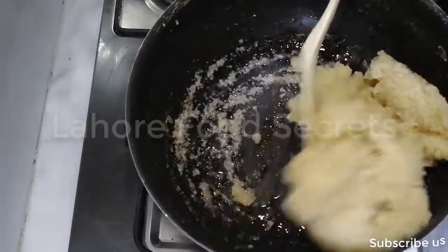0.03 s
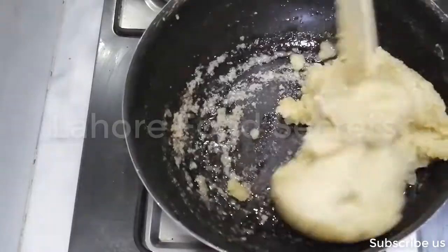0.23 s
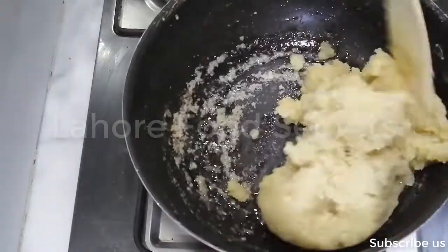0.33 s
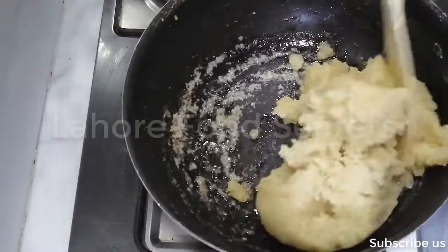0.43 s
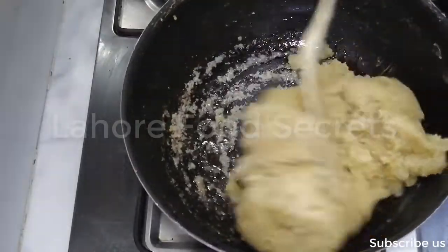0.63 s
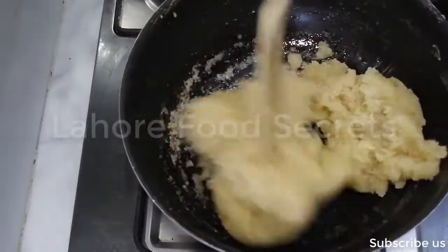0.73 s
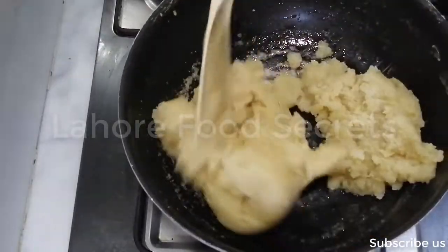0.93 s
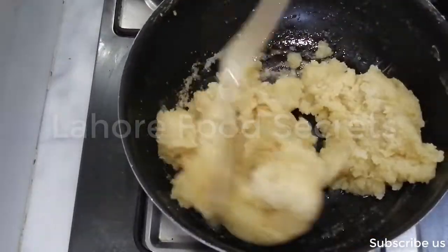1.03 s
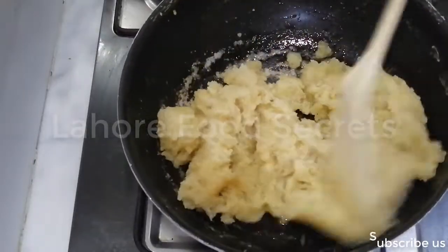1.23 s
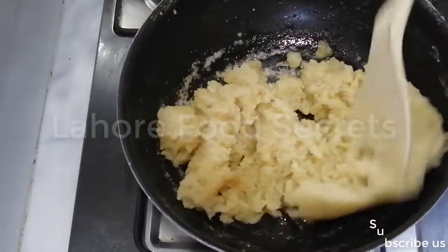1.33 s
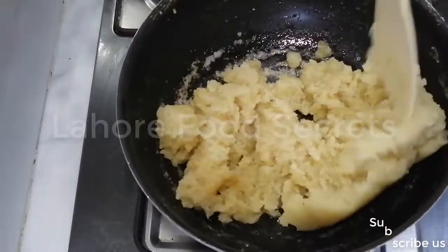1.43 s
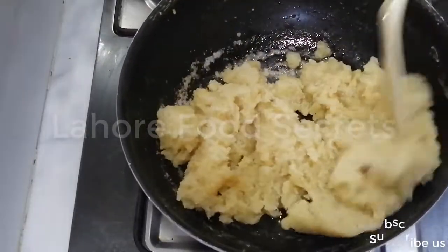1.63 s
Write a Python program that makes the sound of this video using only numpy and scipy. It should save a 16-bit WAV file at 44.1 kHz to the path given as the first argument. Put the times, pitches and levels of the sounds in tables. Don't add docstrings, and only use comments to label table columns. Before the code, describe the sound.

A spatula stirring thick, grainy food strikes a metal pan hard with a low boom, then scrapes and crackles quietly before two lighter knocks close together; close stereo microphone in a small hard kitchen.

```python
import sys
import numpy as np
from scipy import signal
from scipy.io import wavfile

SR = 44100
rng = np.random.default_rng(int(sys.argv[2]) if len(sys.argv) > 2 else 0)


def wav_out(sig):
    wavfile.write(sys.argv[1], SR, np.round(np.clip(np.atleast_2d(sig).T, -1, 1) * 32767).astype(np.int16))


def undo_db(level):
    steps = np.asarray(level, float) / 20
    return 10 ** steps


N = 74970

# frequency in Hz, left-right likeness 0 to 1.
EAR_LIKENESS = [(60, 1), (180, 0.3), (550, 0.53), (1650, 0.15), (4970, 0.02), (15000, 0.025)]
# frequency in Hz, left over right in dB.
EAR_LEAN = [(100, 1), (320, 3.5), (700, -1.5), (2400, 0.5), (4600, -16.5), (7200, 6), (9800, 9.5),
            (14500, -15.5)]
# frequency in Hz, density in dB per Hz.
LOW_AIR_SPECTRUM = [(25, -44), (45, -15), (75, 4), (130, -8.5), (210, -19), (300, -6.5), (750, -12.5),
                    (1500, -18)]
HIGH_AIR_SPECTRUM = [(1000, -28), (2000, -13), (3200, 4), (3900, 0.5), (5600, -6), (9000, -2), (13000, 3),
                     (16000, -5.5)]
LOW_AIR_DB, HIGH_AIR_DB = -60, -62.5

# time in seconds, sizzle in dB, scrape in dB.
STROKE_LEVELS = [(0, -60, -67.5), (.15, -60.5, -69), (.3, -62.5, -61.5), (.5, -63, -74),
                 (.65, -58.5, -67.5), (.75, -58.5, -67.5), (.78, -55.5, -66), (.87, -53.5, -64),
                 (.93, -55.5, -60.5), (1.0, -56, -59.5), (1.02, -53.5, -62.5), (1.1, -50.5, -57),
                 (1.14, -56.5, -64), (1.16, -56.5, -65), (1.3, -58.5, -67.5), (1.5, -55, -64.5),
                 (1.7, -56.5, -65)]
# frequency in Hz, width in Hz, level in dB.
SIZZLE_PEAKS = [(4210, 430, -8), (5500, 530, 5), (6000, 780, 5.5), (6800, 2100, -5), (7120, 840, 4.5),
                (8800, 5600, -56.5)]
SCRAPE_PEAKS = [(739, 33, 3), (1424, 40, -11.5), (1950, 91, 1), (2415, 40, -4), (2780, 420, 4),
                (3226, 270, -1)]
# time in seconds, hum in dB, shove in dB.
LOAD_LEVELS = [(0, -50.5, -52), (.04, -46.5, -79), (.09, -58.5, -64), (.3, -50.5, -52), (.52, -56.5, -72),
               (.62, -58, -70), (.7, -58.5, -57), (.76, -56.5, -86), (.79, -54.5, -62), (.84, -73, -77),
               (.94, -62.5, -48.5), (1.03, -60.5, -63.5), (1.1, -59, -57), (1.21, -74, -56),
               (1.3, -73, -56), (1.45, -113, -64), (1.55, -60, -97), (1.7, -73.5, -55)]
# start in seconds, peak in dB, frequency in Hz, ring t60 in seconds.
BLADE_SNAGS = [(0.119, -50, 1900, 0.0047), (0.655, -44, 5100, 0.0094), (0.781, -49, 1436, 0.1),
               (0.923, -44.5, 2830, 0.0044), (0.988, -43, 8400, 0.00085), (1.013, -38.5, 5500, 0.0045),
               (1.0226, -43, 6250, 0.0067), (1.037, -42, 6800, 0.0046), (1.0852, -35.5, 4760, 0.0066),
               (1.083, -47.5, 1570, 0.03), (1.0994, -40, 6450, 0.0082), (1.107, -45, 2830, 0.014),
               (1.121, -50, 2660, 0.036), (1.175, -63, 5700, 0.0075), (1.3074, -37.5, 5890, 0.017),
               (1.381, -39, 6360, 0.0036), (1.625, -41, 7000, 0.00097)]

# start in seconds, peak in dB, contact softness in seconds, left over right in dB,
# boom lag in seconds.
KNOCK_EVENTS = [
    (0.2313, -23.5, 0.00011, -2, 0.0039),
    (1.1925, -30, 0.00014, -5.5, 0.0073),
    (1.2565, -35, 0.00014, -2, 0.0067),
]
# frequency in Hz, t60 in seconds, level in dB.
BLADE_THOCK = [(1230, 0.0058, -23.5), (1120, 0.024, -27), (1117, 0.01, -29.5)]
# frequency in Hz, t60 in seconds, dB re peak in knocks 1, 2, 3.
WALL_MODES = [(614.5, 0.092, -12.5, -17, -51), (744, 0.087, -12, -32, -28), (743, 0.26, -15, -41, -46),
              (660, 0.052, -3.5, -35, -21.5), (827, 0.16, -3, -11.5, -9.5), (937, 0.11, -16.5, -6, -8),
              (1140, 0.017, -12.5, -17.5, -19), (1270, 0.017, -18, -4, -22), (1428, 0.2, -6.5, -17, -38),
              (1480, 0.31, -16, -9, -15), (1642, 0.11, -47, -1.5, -34), (2205, 0.08, -22, -16.5, -14),
              (2410, 0.21, -8, -13, -10.5), (2830, 0.17, -19, -19, -21)]
RIM_MODES = [(3260, 0.036, -7, -31, -40), (3267, 0.12, -1, -46, -38), (4270, 0.11, -14.5, -38, -41),
             (5242, 0.061, -8, -10.5, -30), (5925, 0.093, -8.5, -4.5, -37), (6530, 0.055, -18, -20, -41),
             (7000, 0.14, -21, -7.5, -39), (10700, 0.063, -40, -14, -44)]
# frequency in Hz, t60 in seconds, dB in knocks 1, 2, 3.
BOOM_MODES = [(83.4, 0.35, -25, -36, -69), (129.8, 0.25, -21.5, -71, -30.5), (170.1, 0.17, -20, -49, -34.5),
              (200.5, 0.053, -17, -36.5, -47), (97.7, 0.49, -35, -60, -35)]
STAND_MODES = [(245.3, 0.59, -35, -55, -67), (280, 0.31, -29.5, -65, -38), (308.6, 0.38, -34.5, -38, -37),
               (326.4, 0.18, -37, -68, -31.5), (327, 0.14, -28, -64, -40), (420, 0.19, -40, -33.5, -42),
               (490.5, 0.27, -26.5, -34.5, -67)]
# low edge in Hz, high edge in Hz, t60 in seconds, dB in knocks 1, 2, 3.
SHIVER_BANDS = [(250, 570, 0.29, -34, -47, -47.5), (620, 1330, 0.33, -36, -44.5, -48),
                (1620, 2560, 0.41, -47, -53, -54.5), (4200, 5700, 0.17, -46.5, -60, -66)]
BOOM_PUSH_S, STAND_PUSH_S = 0.0044, 0.00055
CLUSTER_SHARE, EAR_SPREAD_DB = 0.0413, 3.5
CRACK_DB, CRACK_S, CRACK_TOP_HZ = -6.5, 0.0032, 5500

# start in seconds, peak in dB, frequency in Hz, ring t60 in seconds.
PAN_SETTLES = [(.2455, -26, 720, 0.027), (0.244, -32.5, 1430, 0.043), (0.247, -35, 3250, 0.046),
               (.335, -38.5, 173, 0.14), (.342, -43.5, 325.4, 0.096), (.395, -51, 171.6, 0.11),
               (.575, -52, 299, 0.09), (.775, -49.5, 165, 0.25), (1.266, -38, 680, 0.019),
               (1.325, -46, 280, 0.059), (1.352, -48, 308, .1), (1.385, -51, 300, .12)]
ROOM_T60_S, TREBLE_T60_S, ROOM_DB, WALL_CUT_HZ, ROOM_ALIKE = 0.46, 0.37, -6.5, 1660, 0.1

# frequency in Hz, width in Hz, level in dB.
MIC_DIP_BANDS = [(1860, 430, -3), (3905, 870, -4)]
PORT_HZ, PORT_WIDTH_HZ, PORT_DB = 15600, 1300, 7.5


def rms_one(x):
    return x / np.sqrt(np.mean(x ** 2) + 1e-20)


def even(x):
    envelope = np.abs(signal.hilbert(rms_one(x)))
    return rms_one(x / (0.13 + envelope))


def in_time(rows):
    s, *columns = np.transpose(rows)
    return [np.interp(np.arange(N) / SR, s, c) for c in columns]


def at_hz(points, hz):
    table = np.array(points)
    return np.interp(np.log(hz), np.log(table[:, 0]), table[:, 1])


def band(x, low_hz, high_hz, order=2):
    return signal.sosfilt(signal.butter(order, [low_hz, high_hz], "band", fs=SR, output="sos"), x)


def drift(rate_hz):
    r = np.exp(-80 * np.pi * rate_hz / SR)
    slow = signal.lfilter([1], [1, -2 * r, r * r], rng.standard_normal(N // 40 + 2002))[2000:]
    return np.interp(np.arange(N) / 40, np.arange(len(slow)), rms_one(slow))


def ring(x, hz, t60_s):
    r = undo_db(-60 / (max(t60_s, .001) * SR))
    w = 2 * np.pi * hz / SR
    return signal.lfilter([0, np.sin(w)], [1, -2 * r * np.cos(w), r * r], x + 1e-18)


def sides(db):
    return undo_db(np.array([[.5], [-.5]]) * db)


def lean(hz):
    return sides(at_hz(EAR_LEAN, hz))


def ears(mid, side, alike):
    return np.sqrt(1 + alike) * mid + np.sqrt(1 - alike) * side * [[1], [-1]]


def ears_at(mid, side, hz):
    return ears(mid, side, np.clip(at_hz(EAR_LIKENESS, hz), -1, 1))


def air(spectrum, patchy_db):
    out = 0
    edges_hz = 22 * 2 ** np.arange(0, 9.7, 1 / 3)
    white = rng.standard_normal((2, 2, N))
    for k, (low_hz, high_hz) in enumerate(zip(edges_hz, edges_hz[1:])):
        hz = np.sqrt(low_hz * high_hz)
        if .7 * spectrum[0][0] < hz < 1.3 * spectrum[-1][0]:
            mid, side = band(white[k % 2], low_hz, high_hz)
            gain = undo_db(at_hz(spectrum, hz) + patchy_db * drift(2.8)) * lean(hz)
            out = out + gain * ears_at(mid, side, hz)
    return rms_one(out)


def grains(peaks, per_s, spread_db, throb_db):
    out = 0
    for hz, width_hz, db in peaks:
        born = rng.random((2, N)) < per_s * undo_db(throb_db * drift(25)) / SR
        height = undo_db(spread_db * np.minimum(rng.exponential(1, (2, N)), 5))
        clicks = born * height * rng.choice([-1, 1], (2, N))
        mid, side = ring(clicks, hz, np.log(1000) / np.pi / max(width_hz, 60))
        out = out + undo_db(db) * rms_one(ears_at(mid, side, hz)) * lean(hz)
    return rms_one(out)


def stir():
    sizzle_db, scrape_db = in_time(STROKE_LEVELS)
    sizzle = grains(SIZZLE_PEAKS, per_s=2500, spread_db=1.5, throb_db=4)
    scrape = grains(SCRAPE_PEAKS, per_s=600, spread_db=2.5, throb_db=4.5)
    return undo_db(sizzle_db + 1.0) * sizzle + undo_db(scrape_db + 2.5) * scrape


def load():
    hum_db, shove_db = in_time(LOAD_LEVELS)
    hum = ring(ring(rng.standard_normal(N + SR), 159.5, 0.22), 151.0, 0.02)[SR:]
    shove = band(rng.standard_normal(N + SR), 38, 85)[SR:]
    return undo_db(hum_db) * even(hum) + undo_db(shove_db) * even(shove) * sides(-5.0)


def snags():
    out = np.zeros(N)
    for s, db, hz, t60_s in BLADE_SNAGS:
        i = int(s * SR)
        burst = np.zeros(N)
        burst[i:i + 60] = rng.standard_normal(60) * np.hanning(60)
        tone = ring(burst, hz, t60_s)
        out += undo_db(db - 0.5) * tone / np.abs(tone).max()
    return out * sides(-3)


def shiver(k, length):
    out = 0
    t = np.arange(length) / SR
    for low_hz, high_hz, t60_s, *db in SHIVER_BANDS:
        mid, side = band(rng.standard_normal((2, SR // 2)), low_hz, high_hz)[:, :length]
        both = rms_one(mid + 1.43 * side * [[1], [-1]]) * lean(np.sqrt(low_hz * high_hz))
        out = out + both * undo_db(db[k] - 60 * t / t60_s) * (1 - np.exp(-t / 0.003))
    return out


def crack(length):
    decay = np.exp(-np.arange(length) / SR / CRACK_S)
    noise = undo_db(CRACK_DB) * 8 * rng.standard_normal((2, length)) * decay
    return band(noise, 300, CRACK_TOP_HZ, order=3)


def wall_ring(tap, k, luck):
    out = np.zeros((2, len(tap)))
    for j, (row, family) in enumerate(zip(WALL_MODES + RIM_MODES, luck)):
        hz, t60_s = row[:2]
        for off, left, right in family:
            tone = ring(tap, hz * (1 + CLUSTER_SHARE * off), 0.5 * t60_s)
            gain = undo_db(row[2 + k] + EAR_SPREAD_DB * np.array([[left], [right]]))
            out += gain * tone * (-1) ** j * lean(hz)
    return out


def knocks():
    wall, low = np.zeros((2, 2, N))
    t = np.arange(2000) / SR
    swing = t * np.exp(-t / BOOM_PUSH_S) * np.sin(2 * np.pi * 165 * t)
    luck = rng.standard_normal((len(WALL_MODES + RIM_MODES), 4, 3))
    luck[:, :, 0] = np.linspace(-1, 1, 4) + luck[:, :, 0] / 4
    for k, (s, db, soft_s, pan_db, lag_s) in enumerate(KNOCK_EVENTS):
        i = int(s * SR)
        length = min(N - i, SR // 2)
        tap, push, jolt = np.zeros((3, length))
        tap[0], tap[int(.0012 * SR)] = 1, -.6
        tap = signal.lfilter([1], [1, -np.exp(-1 / (max(soft_s, 1e-5) * SR))], tap)
        late = int(max(lag_s, 0) * SR)
        push[late:late + 2000] = 2 * swing / np.abs(swing).sum()
        jolt[:2000] = t * np.exp(-t / STAND_PUSH_S) / (STAND_PUSH_S ** 2 * SR)

        struck = crack(length) + wall_ring(tap, k, luck)
        thock_hz, thock_t60_s, thock_db = BLADE_THOCK[k]
        thock = undo_db(thock_db) * ring(tap / 4, thock_hz, thock_t60_s)
        wall[:, i:i + length] += (undo_db(db) * struck / 8 + thock) * sides(pan_db)

        boom = sum(undo_db(row[2 + k]) * ring(push, row[0], row[1]) for row in BOOM_MODES)
        bars = sum(undo_db(row[2 + k]) * ring(jolt, row[0], row[1]) * lean(row[0]) for row in STAND_MODES)
        low[:, i:i + length] += boom + bars + shiver(k, length)
    return wall, low


def settles():
    out = np.zeros(N)
    for s, db, hz, t60_s in PAN_SETTLES:
        i = int(s * SR)
        t = np.arange(int(3 * SR / hz)) / SR
        push = np.zeros(N)
        push[i:i + len(t)] = np.hanning(len(t)) * np.sin(2 * np.pi * hz * t)
        tone = ring(push, hz, t60_s)
        out += undo_db(db) * tone / np.abs(tone).max()
    return out


def kitchen(x):
    t = np.arange(SR // 2) / SR
    mid, side = rng.standard_normal((2, len(t)))
    noise = ears(mid, side, ROOM_ALIKE)
    dull = signal.sosfilt(signal.butter(2, WALL_CUT_HZ, fs=SR, output="sos"), noise)
    tail = dull * undo_db(-60 * t / ROOM_T60_S) + (noise - dull) * undo_db(-60 * t / TREBLE_T60_S)
    tail = tail * (1 - np.exp(-t / 0.00066))
    thin = signal.sosfilt(signal.butter(3, 200, "high", fs=SR, output="sos"), x)
    return signal.fftconvolve(thin[None], tail / 40, axes=1)[:, :N]


def scene():
    floor = undo_db(LOW_AIR_DB) * air(LOW_AIR_SPECTRUM, patchy_db=-2.0)
    floor = floor + undo_db(HIGH_AIR_DB) * air(HIGH_AIR_SPECTRUM, patchy_db=1.5)
    wall, boom = knocks()
    pan = wall + snags()
    room = undo_db(ROOM_DB) * kitchen(pan.mean(axis=0))
    return floor + stir() + load() + pan + boom + settles() + room


def low_pass(x):
    return signal.sosfilt(signal.butter(12, 16150, fs=SR, output="sos"), x)


def record(dry):
    heard = dry
    for hz, width_hz, db in [(PORT_HZ, PORT_WIDTH_HZ, PORT_DB), *MIC_DIP_BANDS]:
        b, a = signal.iirpeak(hz, hz / width_hz, fs=SR)
        heard = heard + (undo_db(db) - 1) * signal.lfilter(b, a, heard)
    return low_pass(heard)


dry = scene()
out = record(dry)
wav_out(out)
```